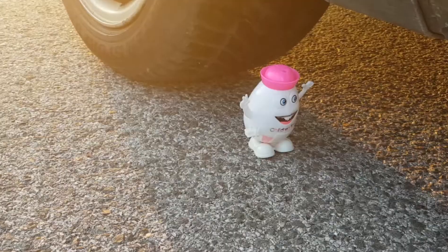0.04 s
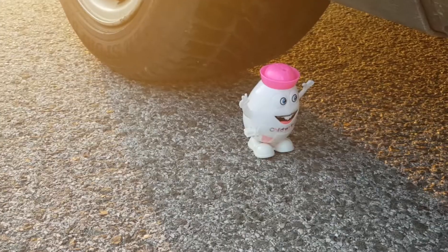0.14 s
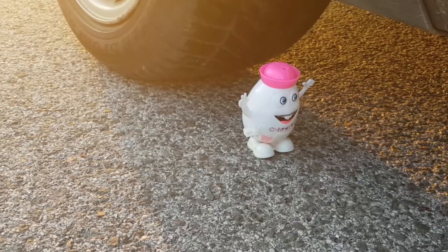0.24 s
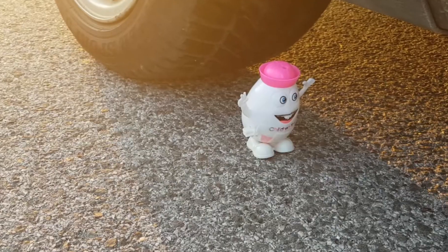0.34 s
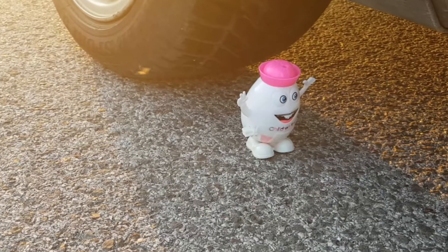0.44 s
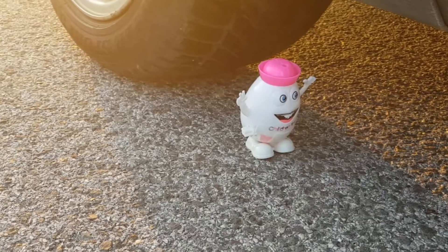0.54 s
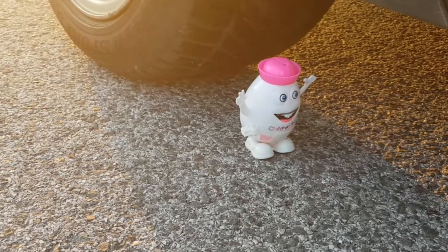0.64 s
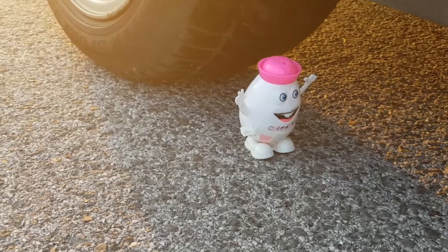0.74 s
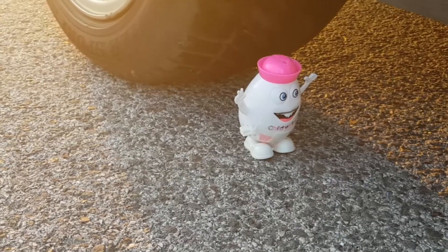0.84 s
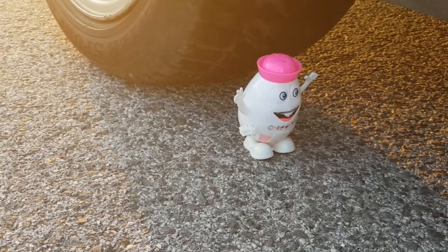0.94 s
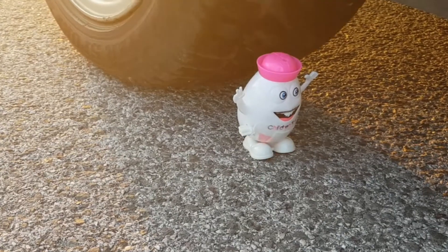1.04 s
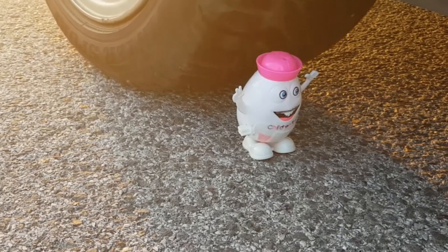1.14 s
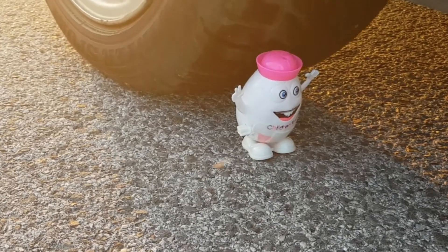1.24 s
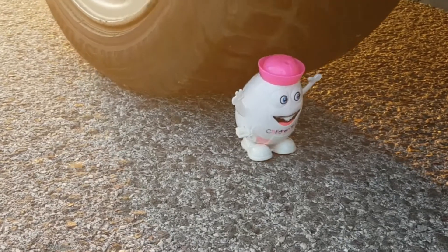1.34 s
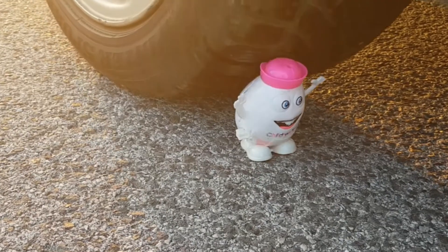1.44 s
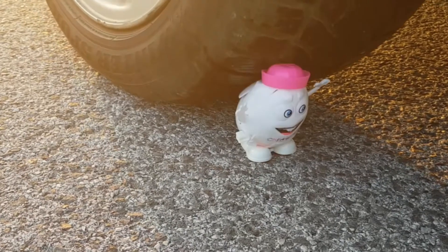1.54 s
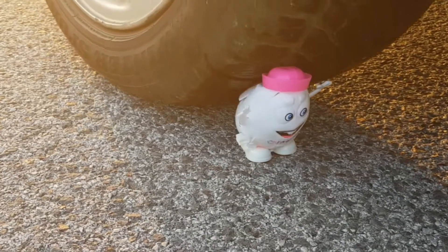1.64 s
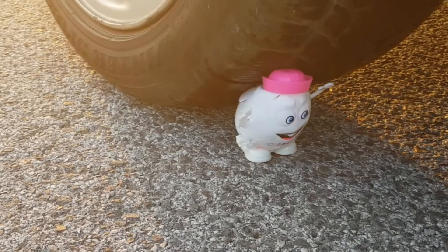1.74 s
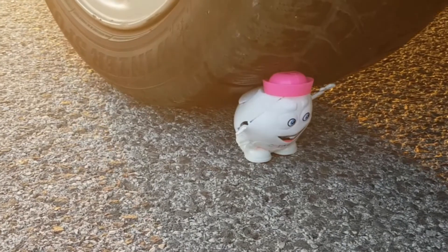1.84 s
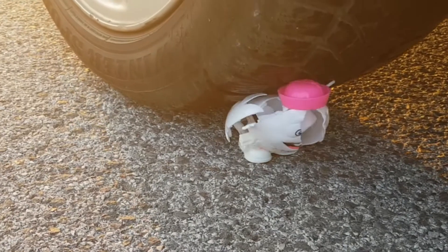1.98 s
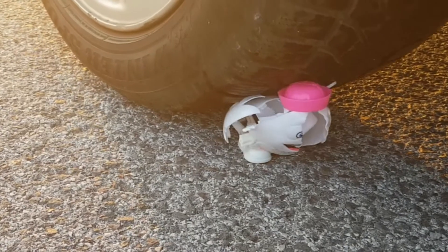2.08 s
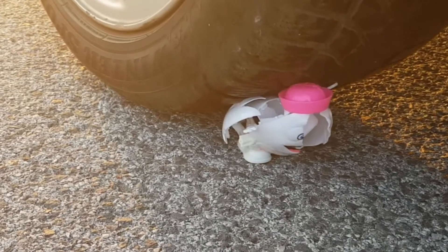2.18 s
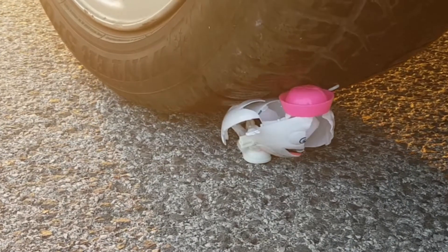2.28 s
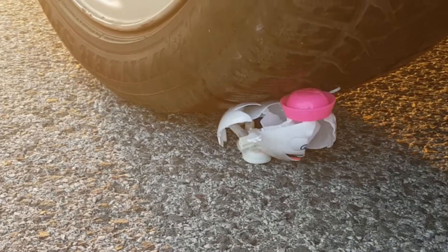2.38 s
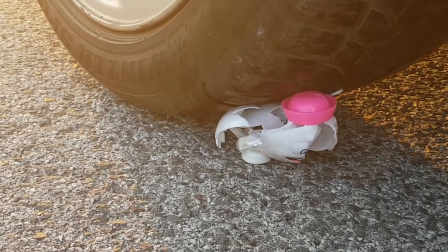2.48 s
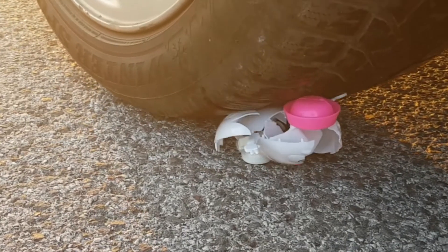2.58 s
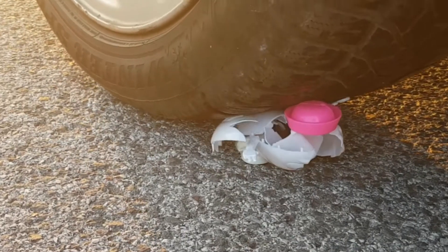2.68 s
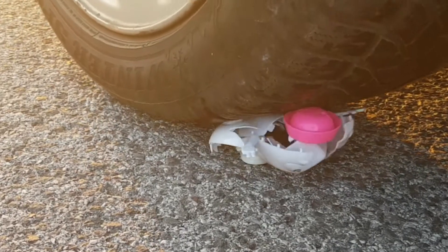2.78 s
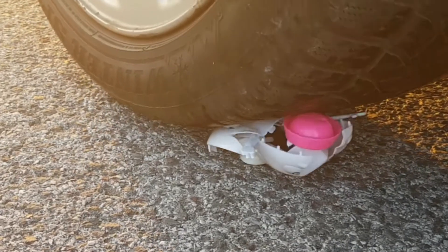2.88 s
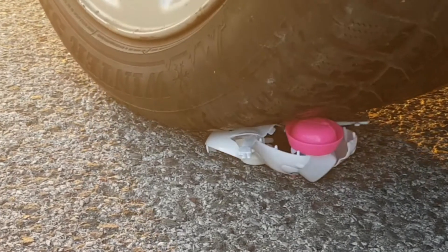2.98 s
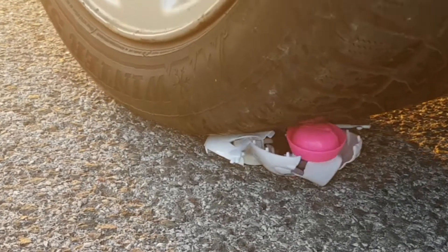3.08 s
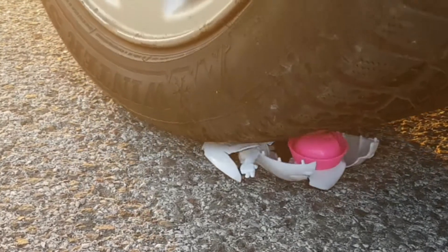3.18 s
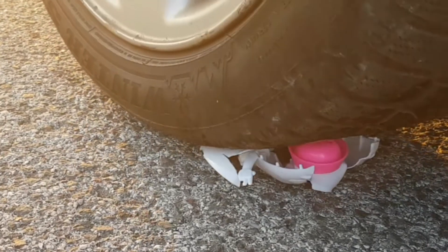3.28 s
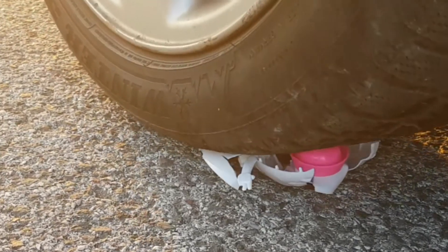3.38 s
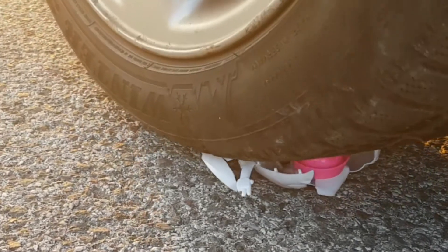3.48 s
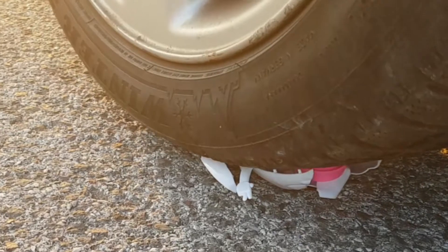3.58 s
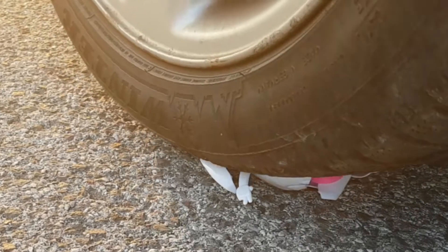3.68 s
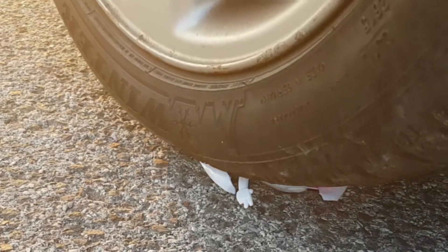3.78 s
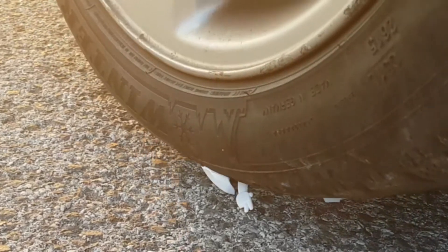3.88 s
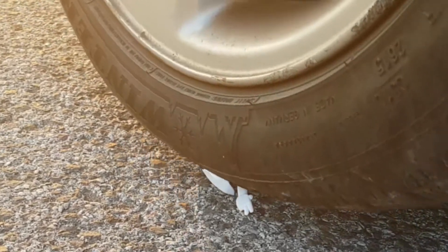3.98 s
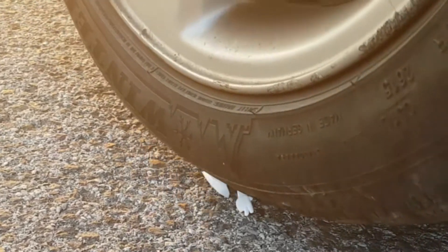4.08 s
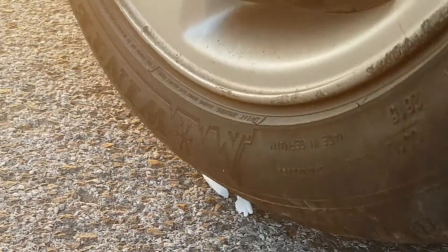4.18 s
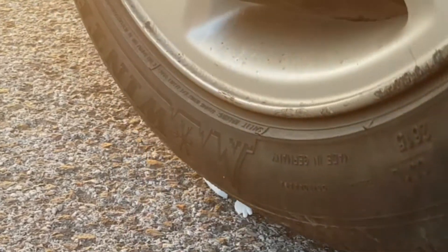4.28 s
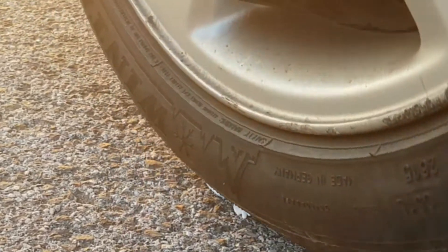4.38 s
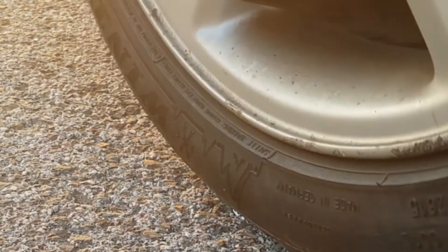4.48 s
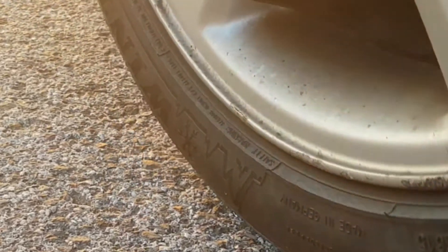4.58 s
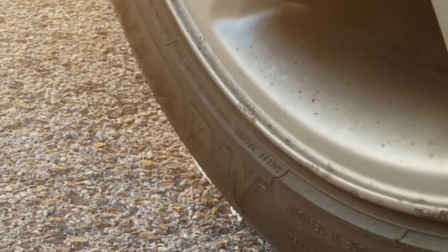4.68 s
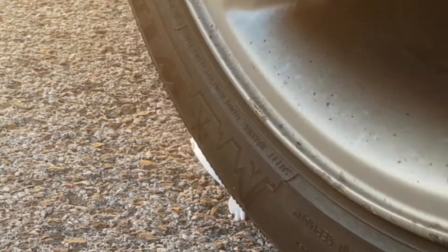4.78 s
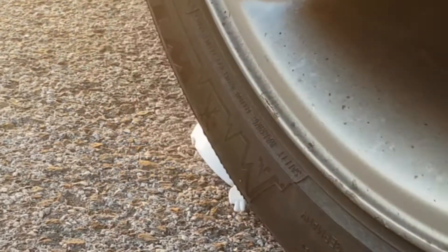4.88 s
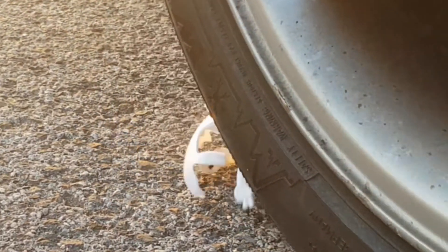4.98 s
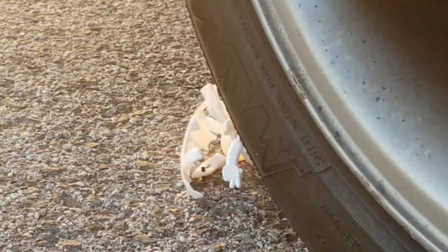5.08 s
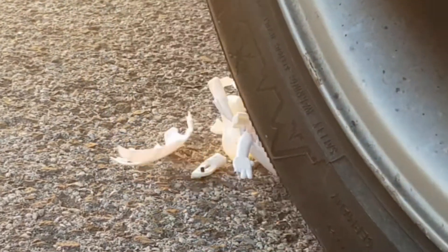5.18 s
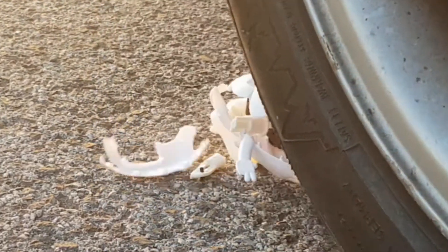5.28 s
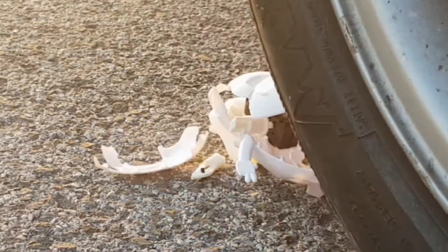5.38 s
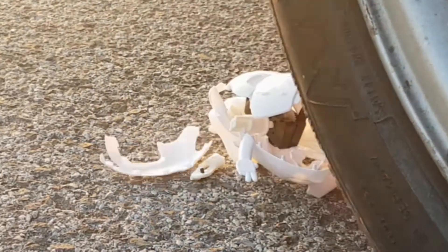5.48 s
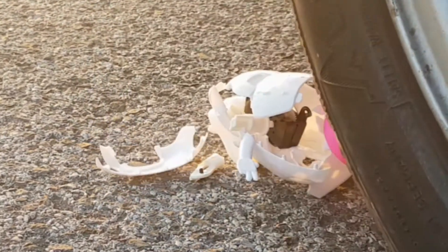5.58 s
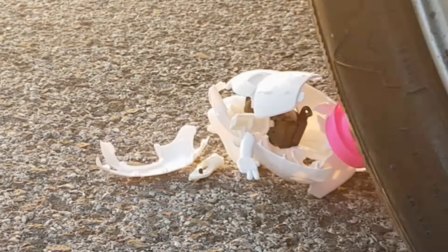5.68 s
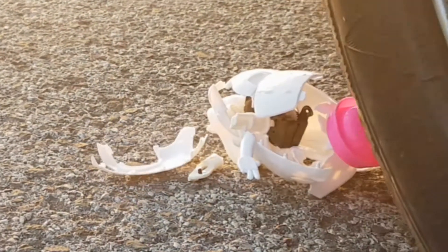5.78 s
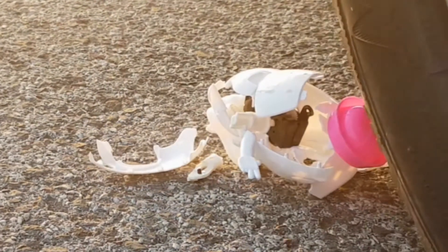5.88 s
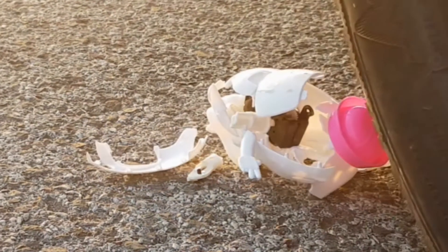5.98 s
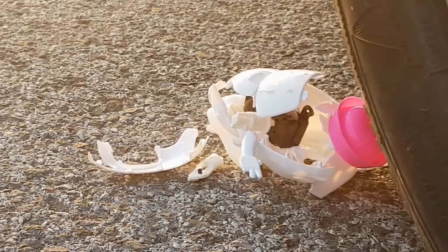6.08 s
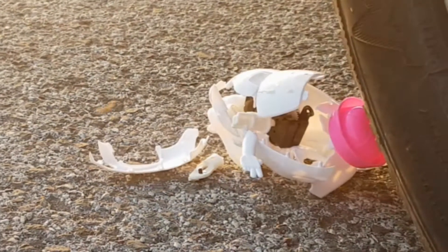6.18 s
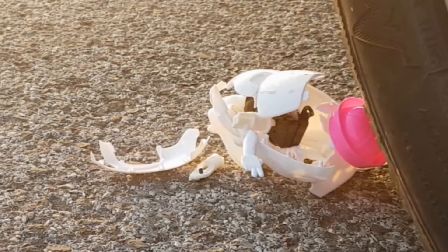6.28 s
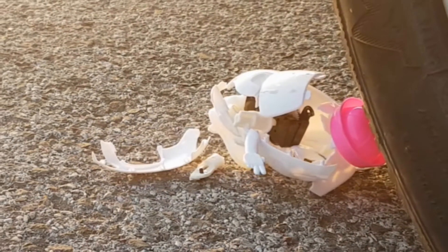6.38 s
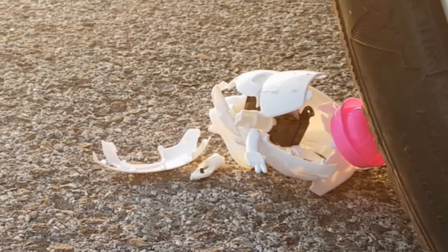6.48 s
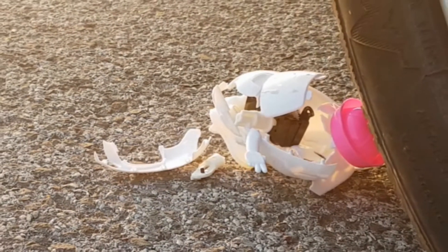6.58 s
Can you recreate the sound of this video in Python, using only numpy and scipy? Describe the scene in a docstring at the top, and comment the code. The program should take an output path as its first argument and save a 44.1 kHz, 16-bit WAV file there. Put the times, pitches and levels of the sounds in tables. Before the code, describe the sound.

A car idles with a low hum and faint hiss, and its brake groans briefly as it lets go. The tyre then rolls slowly over a hollow plastic toy on asphalt, snapping the shell in irregular clusters of sharp cracks with dull thuds and a brief ring from the tyre. Softer crunches follow, and the brake groans again as the car stops. Heard outdoors in stereo, close to the ground.

```python
"""First you hear a car idling and humming in a faint hiss, and its brake groans as it lets go.
A tyre then rolls slowly over a hollow plastic toy on asphalt. The shell snaps piece by piece,
thumps the tyre and puffs out air; some blows make the air in the tyre ring. The background swells
around each snap and sinks after loud ones. At last the brake groans again as the car stops.
Two microphones, a little apart and close to the ground, pick it all up."""
import sys
import numpy as np
from scipy.fft import rfft, irfft, next_fast_len
from scipy.io import wavfile
from scipy.ndimage import map_coordinates

SR = 44100
rng = np.random.default_rng(int(sys.argv[2]) if len(sys.argv) > 2 else 0)


def digitize_waveform(pressure):
    """Quantize a signal to 16-bit integers and store it at the path in sys.argv[1].

    Rows of a 2-D input are taken as channels; values are limited to [-1, 1].
    """
    field = np.atleast_2d(pressure).T
    bounded = np.clip(field, -1, 1)
    quanta = np.round(bounded * 32767).astype(np.int16)
    wavfile.write(sys.argv[1], SR, quanta)


N = 292824

# The background before swells are added. Each row: time in seconds, hum in dB, hiss in dB.
BACKGROUND_LEVELS = [(0.0, -49.5, -52), (0.4, -41, -46), (0.7, -53, -52.5), (1.42, -51.5, -51),
                     (1.62, -91.5, -81), (1.96, -57, -73), (2.2, -93, -87), (2.44, -63, -62),
                     (2.7, -68.5, -71), (3.14, -63, -60), (3.38, -88, -84), (3.73, -90.5, -91.5),
                     (3.9, -54, -57), (4.1, -71.5, -68.5), (4.36, -78, -76), (4.68, -65, -63),
                     (4.78, -58, -53), (5.62, -59, -57), (6.64, -59.5, -57.5)]
# How strong the car's rumble is. Each row: time in seconds, level in dB compared with the hum.
RUMBLE_LEVELS = [(0, -9.5), (.7, 1), (2.6, -2), (2.85, -28), (3.9, -20.5), (4.1, -13), (6.64, -15)]
# The tone colours of hum, rumble and hiss. Each row: frequency in Hz, relative level in dB.
HUM_SPECTRUM = [(88, -34), (150, -7.5), (204, -9.5), (248, -2.5), (312, -5.5), (589, -11.5), (674, -19),
                (794, -29.5), (918, -20), (1390, -19.5), (1500, -31.5), (1950, -50), (3300, -120)]
RUMBLE_SPECTRUM = [(13, -41.5), (22, -18), (54, -5.5), (108, -10), (168, -2.5), (200, -5), (260, -31),
                   (440, -120)]
HISS_SPECTRUM = [(410, -31), (700, 1), (799, -2), (924, -0.5), (1160, -8.5), (1340, -2.5), (1430, -8.5),
                 (1650, -7), (3420, -7.5), (4280, -17.5), (7870, -18), (9720, -28.5), (14500, -18.5),
                 (15900, -30), (16500, -45)]
# The engine's tones. Each row: multiple of the firing rate, relative level in dB.
ENGINE_HARMONICS = [(1, -11), (2, -6), (3, -4), (4, -7), (5, -5), (6, -8)]
# The car's whines: throughout, while the wheel rolls, and once it has passed.
# Each row: pitch in Hz, relative level in dB.
CAR_WHINE = [(253, -5), (447, -19), (673, -18), (910, -20)]
ROLLING_WHINE = [(1351, -19), (6379, -24), (12758, -27)]
PASSED_WHINE = [(1880, -65), (3044, -71)]
# Jolts of brake and body. Each row: time in seconds, then boom, clank and scrape levels in dB.
BRAKE_JOLTS = [(0.205, -36.5, -38.5, -55), (0.298, -35.5, -41.5, -65), (0.37, -41, -40.5, -64),
               (0.4, -38, -53, -67), (0.455, -29.5, -41, -54), (0.495, -32.5, -38.5, -53),
               (0.612, -37.5, -64, -51.5), (5.275, -55, -45.5, -55.5), (6.001, -43, -33.5, -46.5),
               (6.04, -48, -57, -54), (6.11, -63, -53.5, -60), (6.372, -54, -49.5, -56.5),
               (6.48, -60, -54, -62)]
# How the car's floor, its frame and the toy ring. Each row: pitch in Hz, width in Hz, level in dB.
FLOOR_MODES = [(85.5, 11, 3.5), (130.7, 18, 6), (177, 57, -1), (260, 12.6, -1.5)]
FRAME_MODES = [(357, 24, -3), (452, 18, 1.5), (560, 25, -1), (670, 25, -1.5), (963, 38, -1.5),
               (1188, 19, -2.5), (1433, 19, -1), (1636, 130, -10.5), (2040, 310, -12)]
TOY_MODES = [(526, 870, -12.5), (803, 120, -5.5), (1535, 240, -16), (2750, 250, -8.5), (3550, 640, -4),
             (4560, 260, -1.5), (5080, 180, -6.5), (7730, 180, 2.5), (12700, 520, -8), (14100, 600, -2)]
# Breaks in the shell. Each row: start in seconds, level in dB, thud in dB compared with that level,
# pitch of the toy's belly in Hz, belly strength in dB, shell pitch in Hz, treble in dB,
# left minus right in dB, length of the tear in milliseconds, rattle in dB compared with the tear.
SHELL_SNAPS = [(1.417, -8.5, -22, 720, -7, 3340, -22, -3.5, 4.5, -11),
               (1.44, -2, -30, 900, -4, 2360, -19.5, -5.5, 3.9, -5.5),
               (1.457, -17, -19, 1010, 9, 2170, -20, -3, 2.6, -3),
               (1.489, -14.5, -27.5, 830, -1.5, 1550, -39, -7.5, 0.93, -29),
               (1.504, -0.5, -21.5, 695, 0, 2520, -10, -2.5, 4.4, -18.5),
               (1.52, -7.5, -27.5, 716, -13.5, 2580, -14.5, -1.5, 2.9, 3),
               (1.559, -31, -36, 654, -10, 2410, -13, -4, 3.1, -2),
               (1.602, -35, -34, 1160, -8, 2930, -11, -2, 3.2, -6),
               (1.668, -58.5, -11.5, 684, -16, 2620, -25, -11, 3.8, -9),
               (1.799, -28, -21.5, 1190, 4.5, 4000, -0.5, -3.5, 5.1, -9),
               (1.825, -7.5, -37.5, 910, -0.5, 2460, -19, -4, 3.2, -15.5),
               (1.895, -28, -43, 1100, 4, 2670, -15, -8, 1.5, 7.5),
               (1.91, -7.5, -32, 1210, -4, 2630, -24.5, -9, 2.8, -18),
               (1.945, -3.5, -19, 452, -6, 2640, -14.5, -4.5, 7.9, 8),
               (1.954, -11.5, -22.5, 1040, -3.5, 3030, -8, 1, 5, 4.5),
               (1.977, -28, -7.5, 850, -16, 3480, -9, -5, 3.5, -41),
               (2.023, -41.5, -12, 654, -32, 2080, -32, -5, 1.7, -24),
               (2.065, -49, -12, 907, -21, 2000, -19, -5, 2.7, -22),
               (2.12, -51, -12.5, 520, -26, 2020, -22, -5, 2.3, -14),
               (2.161, -49, -32, 1300, 0, 2940, -18, -11, 1.7, -24),
               (2.186, -64.5, -9, 895, 3, 3370, -18, -7, 2.3, -9.5),
               (2.251, -22.5, -17.5, 890, -.6, 3050, -34, -2, 3.2, -17),
               (2.267, -14, -18.5, 760, -11.5, 2630, -16.5, -5.5, 3.2, -5.5),
               (2.274, -8.5, -31, 496, 3.3, 2980, 1, 0.5, 6.2, -9.5),
               (2.337, -50, -16, 748, -4, 3060, -10, -2, 2.5, -15),
               (2.376, -35.5, -13.5, 1000, 4, 2190, -15, -7, 3.2, -2),
               (2.402, -5.5, -30, 730, -2, 2650, -12, 2.5, 3, -10),
               (2.476, -35, -31.5, 813, -3, 2170, -15.5, -9.5, 2.2, -14),
               (2.492, -26, -38.5, 452, -1.5, 2140, -4.5, -3.5, 5.2, -16),
               (2.536, -13.5, -27.5, 1100, -13, 2460, -11, -7.5, 4.3, 2.5),
               (2.537, -3, -25, 490, 0.5, 2700, -7, 1, 3.2, -10),
               (2.599, -25, -34.5, 770, -30, 2060, -40, 8, 4.3, -22),
               (2.607, -9, -29.5, 1060, -27, 2040, -24, -4.5, 3.8, -12),
               (2.668, -39, -18, 770, 22, 3130, -22, 4, 2.4, -20.5),
               (2.769, -3.5, -28, 420, 0, 2500, -12, 0, 3.8, -2),
               (2.856, -21, -35, 886, 4.5, 3300, 0.5, 0, 5.2, 6),
               (2.93, -19, -38, 875, 4, 3470, -13.5, -2.5, 4, -14.5),
               (3.004, -26.5, -29.5, 1120, 0, 2286, -16.5, -1, 5.8, 2.5),
               (3.052, -6.5, -59, 483, -4, 2710, -9.5, -6.5, 3.9, -7),
               (3.105, -14, -38, 910, -0.5, 2910, -2.5, -0.1, 3.2, -5),
               (3.119, -16, -34, 945, 7.5, 1516, -1, -6.5, 5.3, -22),
               (3.135, -2.5, -29.5, 593, 5, 2604, -8, -1.8, 5.6, -3.5),
               (3.146, -19.5, -20.5, 466, -1, 2955, -11.5, 10.5, 3.3, 15.5),
               (3.157, -12.5, -27, 685, -3.5, 2760, -12.5, -15, 1.2, 14),
               (3.17, -4, -36.5, 452, 2, 2560, -6, 3.2, 3.8, -6.5),
               (3.415, -83, -23, 657, 7, 3140, -24, -3, 1.8, -10),
               (3.721, -6, -39, 540, 0.5, 1620, -19.5, -3.5, 1.74, -11.5),
               (3.88, -3, -35.5, 785, 10, 3630, -8.5, -5, 3.4, -6),
               (4.016, -12.5, -45, 795, -6, 2740, -11, -0.5, 3.3, -14),
               (4.051, -22.5, -45.5, 808, 1.5, 2800, -10, -0.5, 3.3, -17),
               (4.347, -20.5, -37.5, 810, -1, 2720, -35, 2, 3.4, -13.5),
               (4.401, -39, -22, 700, -4.5, 2820, -23.5, -1, 2.8, -11.5),
               (4.51, -54.5, -20, 738, 2.5, 3226, 11.5, -5, 4, -9.5),
               (4.766, -35.5, -21, 721, -7, 2180, -18, -3.5, 3, -29),
               (4.787, -36.5, -21, 760, -27, 2890, -22, -2, 2.6, -10),
               (4.808, -32, -28, 490, -15, 1760, 8, -4, 4.3, 2),
               (4.844, -44.5, -8, 953, -5, 2190, -20, -12, 2.5, 42),
               (4.891, -41, -27, 799, -15, 2940, -5, 0, 3.3, -14),
               (4.939, -40.5, -15, 802, -12, 3600, -12, -8, 2.7, -1),
               (4.959, -31, -20.5, 810, -11, 2100, -12, 0, 2.5, 10),
               (4.995, -33, -9.5, 974, -24, 2100, -5, 1, 2.7, -9),
               (5.026, -35.5, -8, 794, -7, 1930, -10, -4, 1.9, 9),
               (5.039, -27.5, -27, 477, -5.5, 2800, -10, -3, 1.7, 47),
               (5.058, -28, -14.5, 579, -17, 3940, -16, 0, 4.1, 10),
               (5.065, -25, -37, 732, -16, 2700, -20, -1, 1.6, 9),
               (5.082, -26, -14, 875, -29, 1560, -6.5, -1, 9.5, 27),
               (5.281, -27, -21, 850, -6, 2100, -10, -3, 7.2, 14)]
# Air leaving the toy. Each row: time in seconds, left level in dB, right side as a multiple of the left.
AIR_PUFFS = [(1.507, -12, -1.05), (1.522, -7.5, -0.26), (1.948, -19, 1.2), (1.9619, -14, 1.26),
             (2.2801, -9.5, -0.43), (2.5384, -16, -0.36)]
# Blows that ring the tyre. Each row: start in seconds, level in dB.
TYRE_BLOWS = [(1.954, -36), (2.402, -44), (2.77, -45), (3.17, -27), (3.722, -46), (3.88, -44), (4.347, -52)]
# How the tyre's air rings. Each row: pitch in Hz, relative level in dB, seconds to fade by 60 dB.
TYRE_MODES = [(226, -17, 0.3), (447, 1.5, 0.13), (657, -8, .21), (867, -18, 0.2), (1082, -27.5, .25)]


def amp(db):
    """Turn decibels into a gain to multiply by."""
    return 10 ** (np.asarray(db) / 20)


def unit(x):
    """Scale a signal so its average power is 1."""
    return x / np.sqrt(np.mean(x ** 2) + 1e-20)


def curves(rows):
    """Join timed rows with straight lines: one curve for each column after the time."""
    times, *columns = np.transpose(rows)
    return [np.interp(np.arange(N) / SR, times, column) for column in columns]


def wobble(rate):
    """A smooth random curve that passes through `rate` new values a second."""
    return map_coordinates(rng.standard_normal(int(N * rate / SR) + 4), [np.arange(N) * rate / SR])


def filtered(x, response):
    """Change each frequency in x by what response(frequency) gives."""
    n = x.shape[-1]
    padded = next_fast_len(n + 4096)
    return irfft(rfft(x, padded) * response(np.fft.rfftfreq(padded, 1 / SR)), padded)[..., :n]


def resonances(modes):
    """A filter that rings at each mode, given as pitch in Hz, width in Hz and level in dB."""
    return lambda f: sum((-1) ** k * amp(db) * 1j * f * width / (hz * hz - f * f + 1j * f * width)
                         for k, (hz, width, db) in enumerate(modes))


def noise_pair(n, alike):
    """Left and right noise, from unrelated (alike=0) to identical (alike=1)."""
    shared, apart = rng.standard_normal((2, n))
    angle = np.arccos(alike) / 2
    return np.cos(angle) * shared + np.sin(angle) * apart * [[1], [-1]]


def shaped_noise(spectrum, alike):
    """Left and right noise with the tone colour of a spectrum table."""
    hz, db = np.transpose(spectrum)
    colour = lambda f: amp(np.interp(np.log(f + 1), np.log(hz + 1), db))
    return unit(filtered(noise_pair(N, alike), colour))


def from_right(x, lag_s=.00033):
    """The car is nearer the right microphone, so the left hears it later and weaker."""
    side = np.array([[1], [-1]])
    return filtered(x, lambda f: np.exp(-1j * np.pi * f * lag_s * side)) * amp(-1.1 * side)


def engine_idle(firing_hz=30.2):
    """The engine's firing makes low tones that drift a little, all in step."""
    phase = 2 * np.pi * firing_hz * np.arange(N) / SR + .25 * wobble(2.5)
    return sum(amp(db + .8 * wobble(6)) * np.cos(k * phase - .25 * k * k) for k, db in ENGINE_HARMONICS)


def whine(table):
    """Pure tones that waver slightly in level and pitch."""
    t = np.arange(N) / SR
    return sum(amp(db + 2.2 * wobble(11)) * np.sin(2 * np.pi * hz * t + .7 * wobble(20))
               for hz, db in table)


def background():
    """The running car hums, rumbles and whines over a distant hiss."""
    t = np.arange(N) / SR
    hum_db, hiss_db = curves(BACKGROUND_LEVELS)
    rumble_db, = curves(RUMBLE_LEVELS)
    passed = np.clip((t - 4.8) / 0.24, 0, 1)  # goes from 0 to 1 as the wheel passes
    rolling = np.clip((t - .4) / .5, 0, 1) * (1 - passed)
    hum = shaped_noise(HUM_SPECTRUM, alike=1) + amp(rumble_db + 6.5) * whine(CAR_WHINE)
    rumble = amp(rumble_db + wobble(1.8)) * shaped_noise(RUMBLE_SPECTRUM, alike=1)
    lift = swell()
    hum_gain = np.hypot(amp(hum_db + wobble(27)), amp(-47.5) * lift)
    hiss_gain = np.hypot(amp(hiss_db + 0.55 * wobble(60)), amp(-45) * lift)
    centred_whine = hum_gain * rolling * whine(ROLLING_WHINE)
    engine = amp(-13.5 + 9 * passed) * engine_idle()
    hiss = hiss_gain * shaped_noise(HISS_SPECTRUM, alike=0.037)
    car = hum_gain * (hum + rumble + engine) + passed * whine(PASSED_WHINE)
    return centred_whine + from_right(car + hiss)


def brake_groan():
    """The brake slips unevenly and shakes the car's floor and frame, with a thin scrape on top."""
    t = np.arange(N)[:, None] / SR
    rise_db_s, fall_db_s = [500, 394, 324], [217, 255, 183]  # for boom, clank and scrape
    power = sum(amp(db - np.maximum((at - t) * rise_db_s, (t - at) * fall_db_s)) ** 2
                for at, *db in BRAKE_JOLTS)
    boom, clank, scrape = np.sqrt(power).T
    slips = amp(wobble(45))

    def shake(modes, alike):
        force = slips * noise_pair(N, alike)
        return unit(filtered(force, lambda f: resonances(modes)(f) / (1 + 1j * f / 3000)))

    grit = shake([(2850, 1030, 9), (7140, 2800, 2.5), (13600, 4500, 3)], alike=0.11)
    floor = shake(FLOOR_MODES, alike=0.94)
    frame = shake(FRAME_MODES, alike=0.52)
    return from_right(boom * floor + clank * frame + scrape * grit)


def swell(lead_s=0.057, fall_db_s=260):
    """A gain that rises just before each snap and then sinks; louder snaps lift it more."""
    t = np.arange(N) / SR
    power = np.zeros(N)
    for start, db, *_ in SHELL_SNAPS:
        rise = np.clip((t - start + lead_s) / lead_s, 0, 1) ** 2
        power += (rise * amp(0.43 * db - fall_db_s * np.maximum(t - start, 0))) ** 2
    return np.sqrt(power)


def shell_crack(t, belly_hz, belly_db, shell_hz, treble_db, tear_ms, rattle_db):
    """A crack jumps through the plastic in tiny spikes, and a short rattle follows."""
    n = len(t)

    def jumps(spread_db, samples):
        return amp(spread_db * np.repeat(rng.standard_normal(n // samples + 1), samples)[:n])

    spikes = jumps(spread_db=4, samples=16)
    tear = spikes * (1 - np.exp(-t / 0.0004)) * np.exp(-(1000 * t / tear_ms) ** 2.7)
    rattle = amp(rattle_db - 60 * t / 0.071) * spikes ** .4 * jumps(spread_db=3.5, samples=128)
    low = resonances([(belly_hz, 350, belly_db), (shell_hz, 900, 0)])
    high = resonances([(6310, 1800, treble_db), (12900, 3500, treble_db - 3)])
    # every break leaves a different piece, which rings in its own way
    shifts, changes_db = rng.standard_normal((2, len(TOY_MODES))) * [[.03], [2.5]]
    piece = [resonances([(hz * (1 + shift), width, db + change)])
             for (hz, width, db), shift, change in zip(TOY_MODES, shifts, changes_db)]

    def colour(f):
        shell = low(f) / (1 + 1j * f / 4500) ** 2 + high(f)
        return shell * (.5 + sum(mode(f) for mode in piece))

    crack = filtered((tear + rattle) * noise_pair(n, alike=0.097), colour)
    return crack / np.sqrt(np.mean(crack[:, :260] ** 2))  # the first 6 ms set the level


def tyre_thud(t):
    """The rubber gives way with a short, dull thud."""
    low_noise = unit(filtered(noise_pair(len(t), alike=0.26), resonances([(150, 180, 0)])))
    return low_noise * amp(-60 * t / 0.088) * (1 - np.exp(-t / 0.00023))


def snaps():
    """Each break cracks the shell and thumps the tyre at the same moment."""
    n = SR // 3
    out, t = np.zeros((2, N + n)), np.arange(n) / SR
    side = np.array([[.5], [-.5]])
    for start, db, thud_db, *tone, pan_db, tear_ms, rattle_db in SHELL_SNAPS:
        crack = amp(-11.5) * shell_crack(t, *tone, tear_ms, rattle_db)  # leaves room for its peaks
        thud = amp(thud_db) * tyre_thud(t)
        first = round(start * SR)
        out[:, first:first + n] += amp(db + pan_db * side) * (crack + thud)
    return out[:, :N]


def air_puffs():
    """The toy caves in and blows air past the microphones: a sharp push, then a slower pull back."""
    out, t = np.zeros((2, N)), np.arange(N) / SR
    for at, db, right_share in AIR_PUFFS:
        age = (t - at) / 0.00075
        push = np.exp(-age ** 2)
        pull = 0.13 * np.exp(-((age - 2.8) / 2) ** 2)
        out += amp(db) * (push - pull) * [[1], [right_share]]
    return out


def tyre_rings():
    """The air inside the tyre keeps ringing after some blows."""
    out = np.zeros((2, N))
    for start, db in TYRE_BLOWS:
        t = np.maximum(np.arange(N) / SR - start, 0)
        onset = amp(db) * (1 - np.exp(-t / 0.0031))
        for hz, mode_db, fade_s in TYRE_MODES:
            fade = amp(mode_db + rng.normal(0, 1.4, (2, 1)) - 60 * t / fade_s)
            out += onset * fade * np.sin(2 * np.pi * (hz * t + rng.random((2, 1))))
    return out


def scene():
    """Add up all the sounds at the two microphones."""
    return snaps() + tyre_rings() + air_puffs() + background() + brake_groan()


def record(dry):
    """Gently round off the loudest peaks and cut the treble above 16000 Hz."""
    soft = dry / (1 + np.abs(dry / .85) ** 4) ** (1 / 4)
    return filtered(soft, lambda hz: 1 / (1 + (hz / 16000) ** 120))


dry = scene()
out = record(dry)
digitize_waveform(out)
```